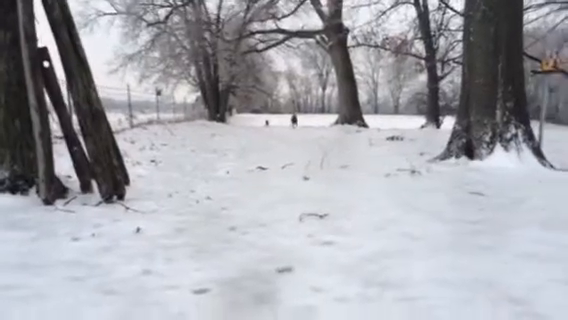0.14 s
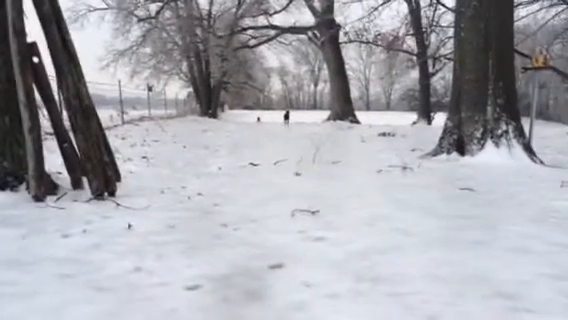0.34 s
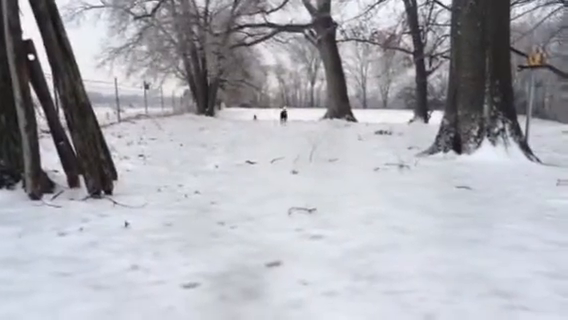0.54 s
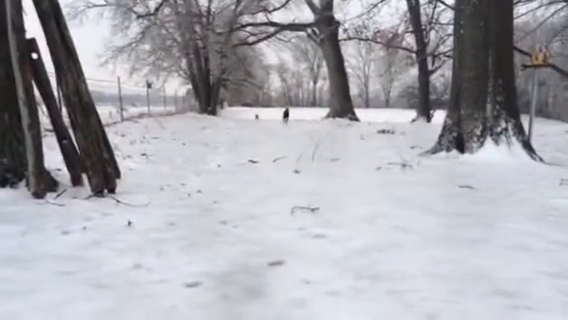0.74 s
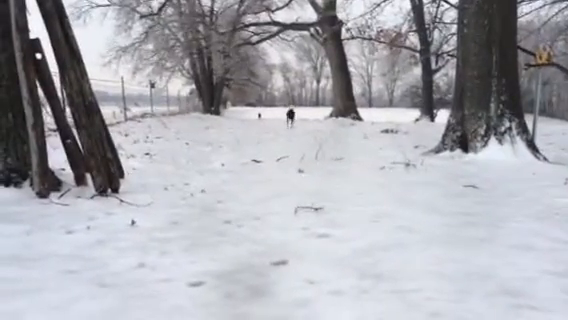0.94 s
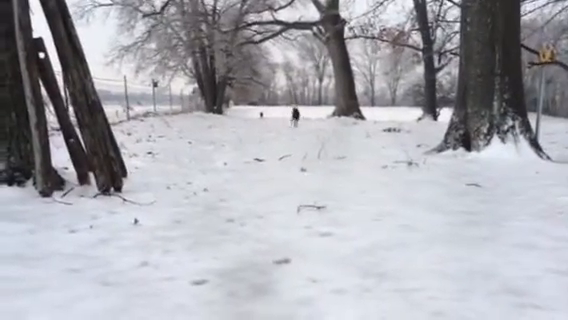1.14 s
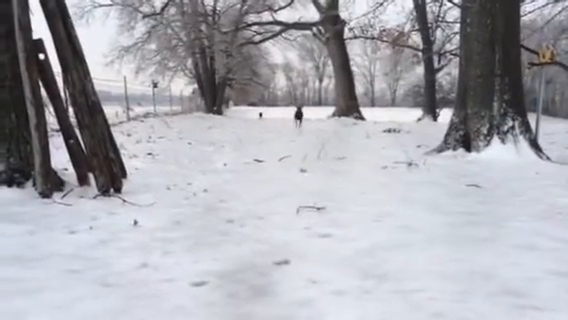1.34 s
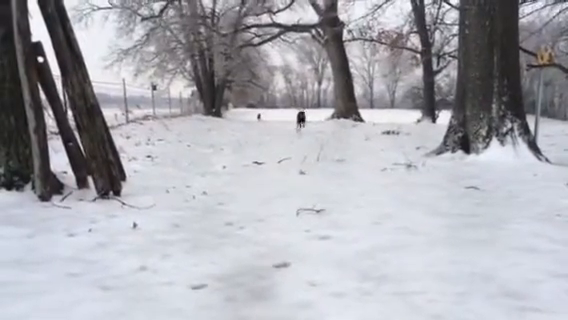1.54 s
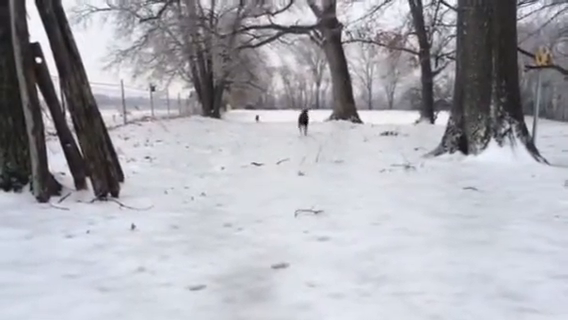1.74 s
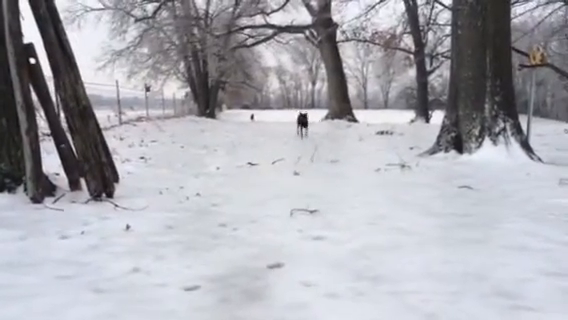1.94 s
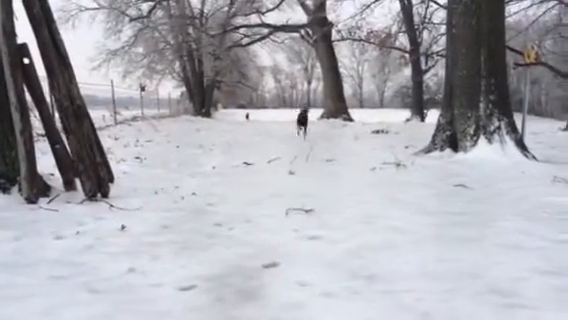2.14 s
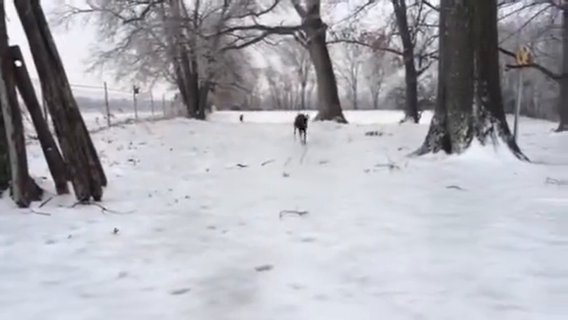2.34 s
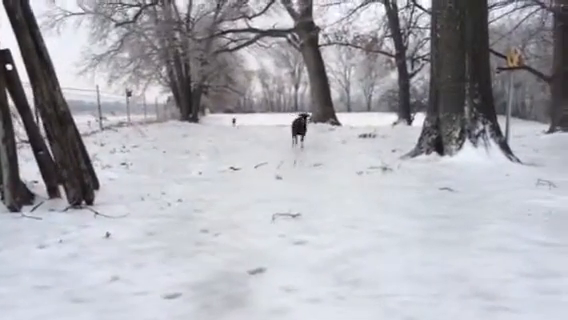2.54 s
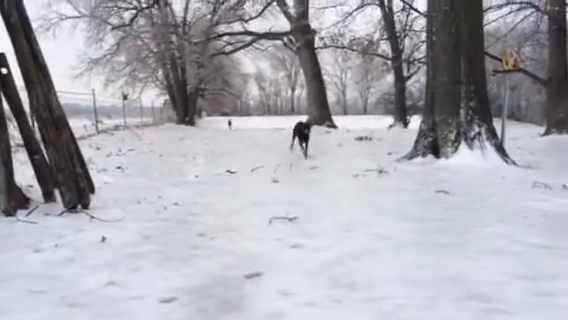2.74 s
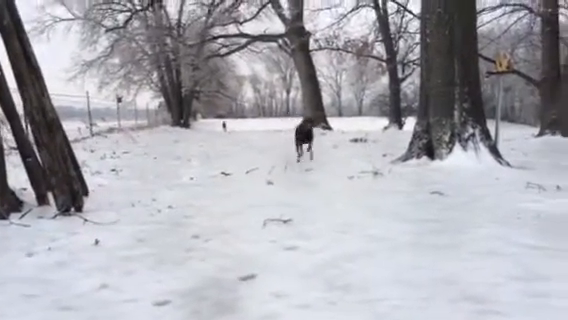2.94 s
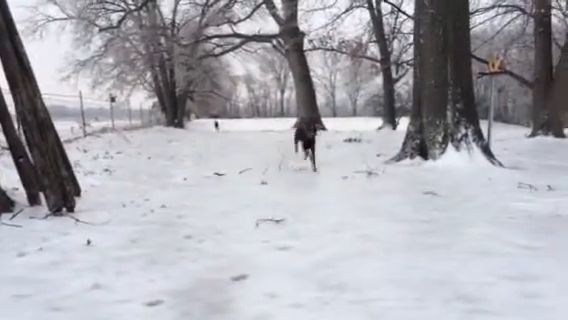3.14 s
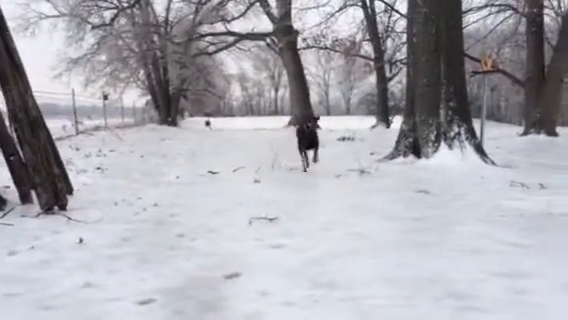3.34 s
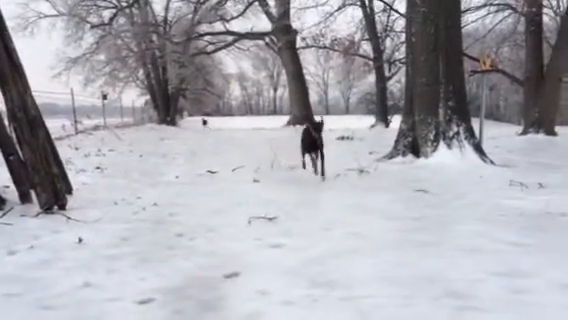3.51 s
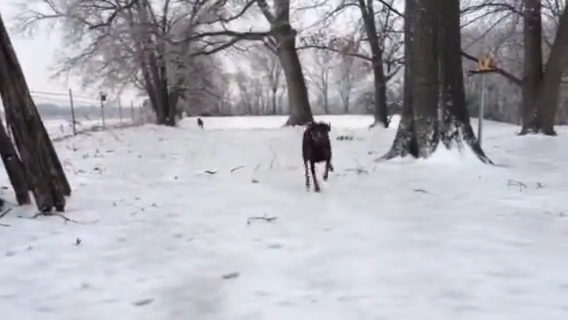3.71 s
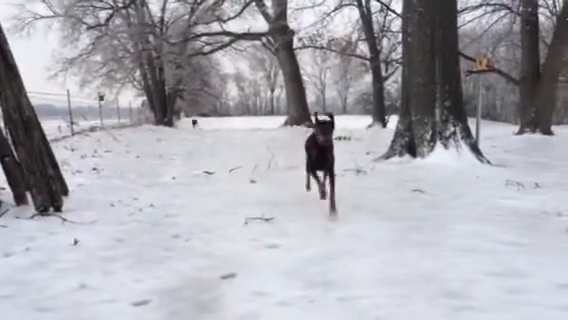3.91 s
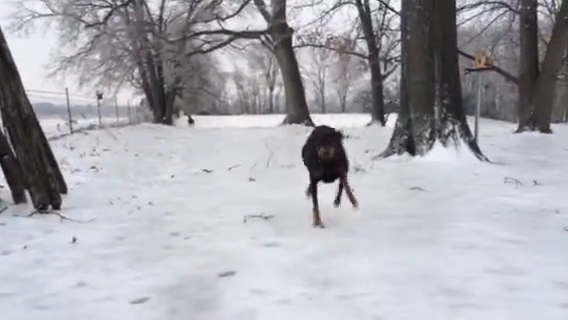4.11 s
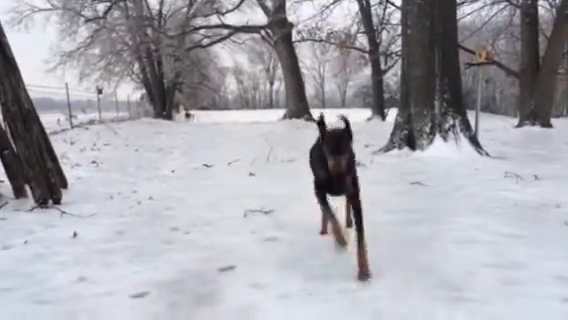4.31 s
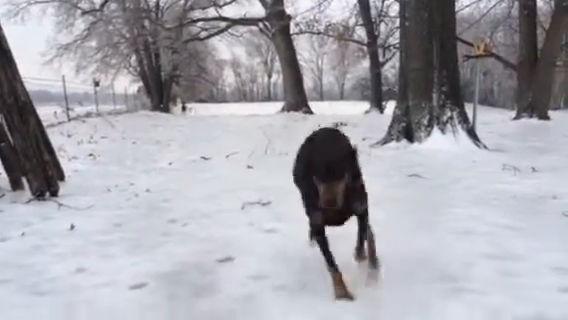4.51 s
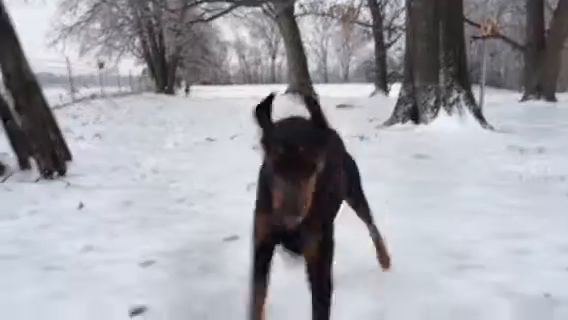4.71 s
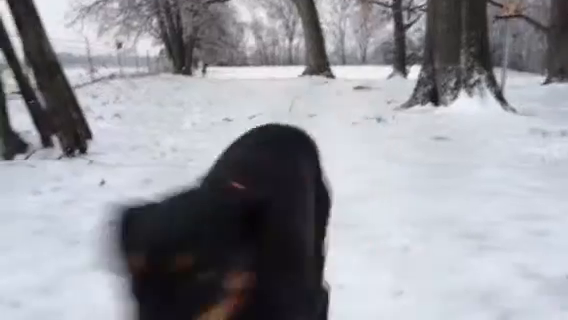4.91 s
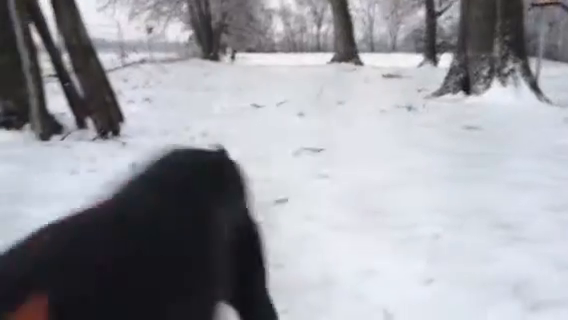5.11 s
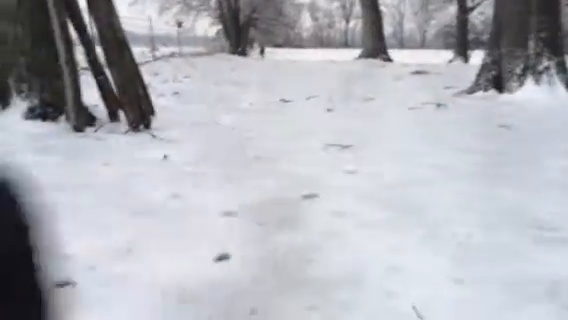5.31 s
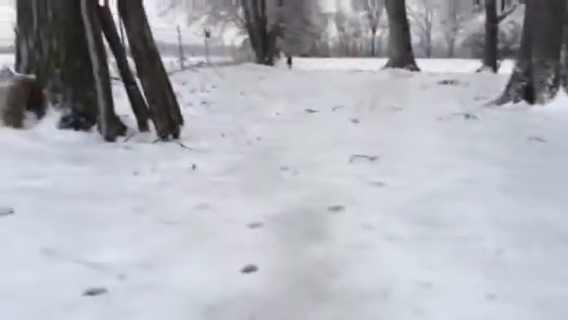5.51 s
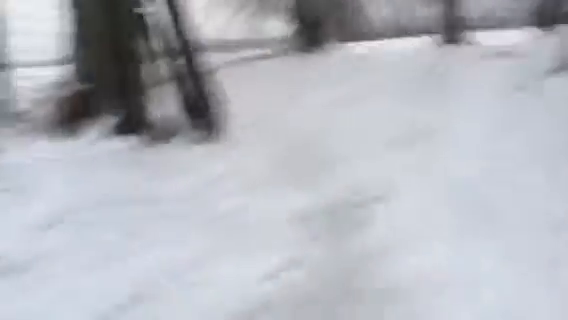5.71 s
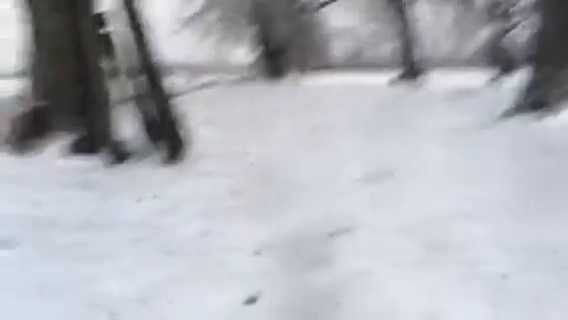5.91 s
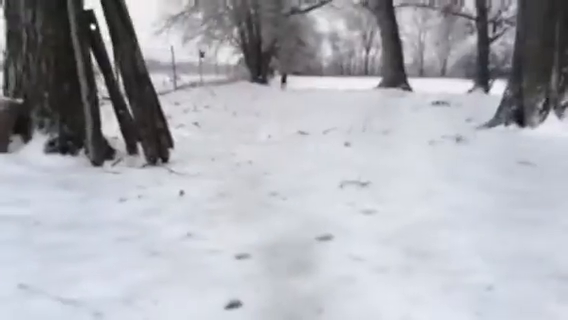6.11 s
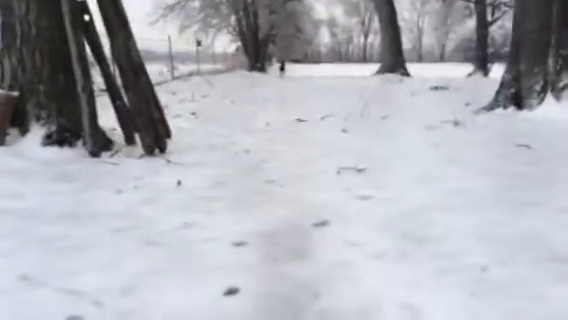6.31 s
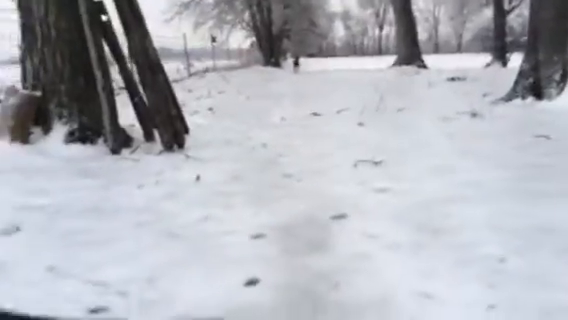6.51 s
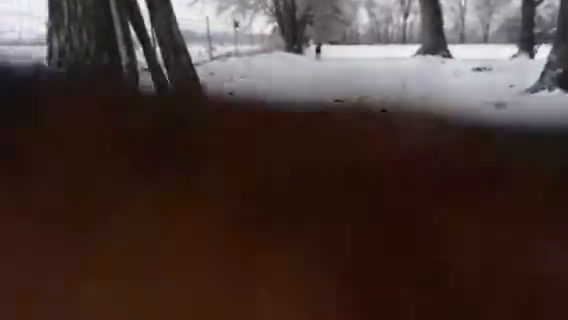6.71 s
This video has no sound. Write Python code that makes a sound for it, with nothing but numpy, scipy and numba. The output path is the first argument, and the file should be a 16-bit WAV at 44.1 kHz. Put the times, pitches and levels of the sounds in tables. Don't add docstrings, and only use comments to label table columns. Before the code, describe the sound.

In a quiet snowy wood, a dog gallops towards a low handheld phone. Faint, rapid paired crunches grow steadily louder, with icy snaps and hollow thuds. It brakes very close in a dense clatter of cracking crust and rattling clods, shuffles around, then huffs softly as the last splinters tick. Light wind buffets the microphone.

```python
import sys
import numpy as np
from scipy import signal
from scipy.fft import rfft, irfft
from scipy.io import wavfile
from scipy.ndimage import uniform_filter1d
from numba import njit

SR = 44100
rng = np.random.default_rng(int(sys.argv[2]) if len(sys.argv) > 2 else 0)


def transcribe(u):
    v = np.clip(np.atleast_2d(u).T, -1, 1)
    q = np.round(v * 32767).astype(np.int16)
    wavfile.write(sys.argv[1], SR, q)


def attenuation_scalar(level_db):
    decades = np.asarray(level_db, float) / 20
    return 10 ** decades


N = 297918
SLOWS_S = 4.9

# (frequency [Hz], density [dB per Hz])
FINE = [(880, -34), (1500, -6.5), (2590, -13.5), (3150, -11.5), (4160, -7), (6240, 1.5), (7100, 1),
        (9190, -4.5), (14600, -7.5), (15500, -20), (16000, -26)]
# (frequency [Hz], density [dB per Hz])
FINE_BESIDE = [(900, -67), (1500, -19), (4000, 3), (8000, 5.5), (14600, 3.5), (16000, 1)]
# (frequency [Hz], density [dB per Hz])
COARSE = [(150, -9), (250, -11), (315, -6.5), (655, -14), (779, -13), (4000, -17.5), (5200, -50),
          (8800, -120)]
# (full load [s], crunch [dB], thud share [dB], unloading [ms])
LEAD = [(.0619, -47.5, -19, 20), (0.239, -48, -11, 24), (0.427, -52, -8, 13), (0.5978, -52.5, -1, 26),
        (0.7874, -52, -13, 9.8), (0.9787, -49, -2.5, 21), (1.1744, -46.5, -8, 10), (1.331, -44.5, 0.5, 19),
        (1.528, -45, -2.5, 7.7), (1.717, -41, -2, 17), (1.911, -44, -3, 20), (2.0912, -45.5, 3, 19),
        (2.2962, -40, -7.5, 6.4), (2.4838, -42, -5, 25), (2.6893, -38, -25, 3.4), (2.875, -35, -13, 13),
        (3.084, -41.5, -7, 9.5), (3.29, -34, -6.5, 8.8), (3.498, -38, -24, 16.6), (3.702, -37, 0.5, 26),
        (3.899, -34, -15, 18.6)]


def noise():
    return rng.standard_normal(N)


def level(x, db=0):
    return x * attenuation_scalar(db) / np.sqrt(np.mean(x ** 2))


def curve(table):
    s, *columns = np.transpose(table)
    return [np.interp(np.arange(N) / SR, s, c) for c in columns]


def colour(x, points):
    hz, db = np.transpose(points)
    grid_hz = np.arange(2049) * SR / 4096 + 1
    log_gain = np.interp(np.log(grid_hz), np.log(hz), db) * np.log(10) / 20
    cepstrum = irfft(log_gain)
    cepstrum[1:2048] *= 2
    cepstrum[2049:] = 0
    taps = irfft(np.exp(rfft(cepstrum)))[:2048]
    return signal.fftconvolve(x, taps / np.sqrt(np.sum(taps ** 2)))[:N]


@njit
def svf(x, hz, width):
    y, b, l = np.empty(len(x)), 0., 0.
    for i in range(len(x)):
        g, k = np.tan(np.pi * hz[i] / SR), width / hz[i]
        v = (b + g * (x[i] - l)) / (1 + g * (g + k))
        b, l, y[i] = 2 * v - b, l + 2 * g * v, k * v
    return y


def steady(x, hz, width_hz):
    return svf(x, np.full(N, float(hz)), float(width_hz))


def add(out, s, piece):
    i = int(s * SR)
    out[max(i, 0):i + len(piece)] += piece[max(-i, 0):N - i]


def even(x, span_s):
    return x / np.sqrt(uniform_filter1d(x ** 2, int(span_s * SR)) + 1e-9)


def swells(s, db, rise_ms, fall_ms):
    out, t = np.zeros(N), np.arange(-SR // 8, SR // 5) / SR
    steepness = np.where(t < 0, 3.5, 1.35)
    for top_s, top_db, rise, fall in zip(s, db, np.clip(rise_ms, 1, 150), np.clip(fall_ms, 1, 150)):
        away = np.abs(t) * 1000 / np.where(t < 0, rise, fall)
        add(out, top_s + t[0], attenuation_scalar(top_db - 9 * away ** steepness))
    return out


def grit(per_s, spread_db, burst_s):
    chance, size = rng.random((2, N))
    size_db = np.minimum(-spread_db * np.log(size + 1e-9), 4 * spread_db)
    grains = (chance < per_s / SR) * attenuation_scalar(size_db)
    return level(signal.lfilter([1], [1, -np.exp(-1 / (burst_s * SR))], grains) * noise())


def shards(x, glide_s, share):
    hold = int(.003 * SR)
    hz = np.repeat(1100 * 9 ** rng.random(N // hold + 1), hold)[:N]
    ring = svf(x, uniform_filter1d(hz, int(glide_s * SR) + 1), 620.0)
    return (1 - share) * x + share * 2.14 * ring


def air():
    # (time [s], level [dB], rising [ms], fading [ms])
    puff_events = [(.03, -61, 27, 10), (.31, -45, 9.9, 18), (.364, -48, 12, 7.8), (0.614, -43, 40, 12),
                   (.69, -57, 45, 17), (1.54, -45.5, 30, 72), (2.34, -55, 15, 94), (2.943, -35, 13, 17),
                   (3.556, -39.5, 18, 19), (3.626, -35, 16, 17), (3.69, -43, 38, 52), (4.098, -52, 27, 14),
                   (4.543, -30.5, 62, 12), (4.874, -22, 15, 26), (5.237, -23.5, 38, 29),
                   (5.308, -29, 10, 48), (5.676, -25.5, 16, 13), (5.84, -46, 160, 32), (6.066, -31, 26, 31),
                   (6.17, -42, 35, 46), (6.487, -27, 7.3, 11), (6.6, -48, 20, 180)]
    # (frequency [Hz], density [dB per Hz])
    buffet = [(20, -50), (45, -3), (85, -3), (130, -5), (200, -14), (300, -45.5)]
    # (frequency [Hz], density [dB per Hz])
    wood = [(35, 5), (60, -1), (108, -27), (268, -9), (803, -10), (4030, -13), (6140, -13.5), (12000, -17),
            (14600, -28), (16000, -35)]
    puffs = swells(*np.transpose(puff_events)) + attenuation_scalar(-62.5)
    gusts = even(colour(noise(), buffet), 0.043)
    gusts = gusts - (np.arange(N) / SR > SLOWS_S) * steady(gusts, 52, 108)
    return puffs * gusts + level(colour(noise(), wood), -63.5)


def crumbs():
    # (time [s], level [dB])
    stir = [(0, -58.5), (2, -46.5), (4, -48), (4.3, -43.5), (4.46, -42), (4.65, -29.5), (5.05, -30.5),
            (5.37, -28.5), (5.41, -52), (5.5, -54), (5.57, -37), (5.86, -40), (5.92, -44), (6.04, -27),
            (6.13, -37.5), (6.46, -37.5), (6.58, -44.5), (6.76, -44)]
    gallop_end_s, rest_db_per_s = stir[2][0], 32
    turn_from_s, turn_to_s, turn_db, drag_share_db = 5.52, 5.93, 12, -7.5
    t = np.arange(N) / SR
    fine_db, = curve(stir)
    landed_s = np.array([row[0] for row in LEAD])
    since_s = t - landed_s[np.maximum(np.searchsorted(landed_s, t) - 1, 0)]
    fine_db = fine_db + (t < gallop_end_s) * (4.0 - rest_db_per_s * since_s)
    turning = np.clip(np.minimum(t - turn_from_s, turn_to_s - t) / 0.19, 0, 1)
    drag_db = fine_db + drag_share_db + turn_db * turning
    patter = colour(shards(grit(per_s=800.0, spread_db=9.0, burst_s=0.0072), 0.00024, 0.55), FINE)
    drag = colour(grit(per_s=1200.0, spread_db=10.5, burst_s=0.0051), COARSE)
    splinters = colour(shards(grit(per_s=80., spread_db=3.5, burst_s=.0005), .0002, .75), FINE_BESIDE)
    settling = (t > turn_from_s) * attenuation_scalar(-43.5 - 40 * np.abs(t - turn_to_s))
    return settling * splinters + attenuation_scalar(fine_db - 8.5) * patter + attenuation_scalar(drag_db - 9.0) * drag


def falls():
    # (full load [s], crunch [dB], thud share [dB], unloading [ms])
    trail = [(0.118, -48.5, -21, 7.5), (0.2815, -46, -8, 11), (0.4804, -47, -5, 20), (0.65, -47, 2, 14),
             (0.8564, -46.5, 4, 9.1), (1.0223, -48.5, 12, 18), (1.233, -45, -5, 23), (1.384, -44, 6.5, 21),
             (1.6003, -45.5, -2, 17), (1.767, -43.5, 1.5, 26), (1.988, -45.5, 1, 34), (2.147, -48.5, 7, 42),
             (2.373, -39, -6, 12), (2.5477, -37.5, -4, 2.6), (2.752, -44, -3, 20), (2.94, -40, -2, 30),
             (3.148, -36.5, -2.5, 15), (3.355, -34, -10.5, 15.6), (3.5728, -35, -24, 17),
             (3.748, -33.5, -21, 29), (3.972, -33, -4, 26.5)]
    # (time [s], crunch [dB], half length [ms])
    scuffs = [
        (0.768, -54, 10),
        (1.0845, -55, 20),
        (1.19, -55, 6.1),
        (1.4557, -53.5, 12),
        (1.844, -52, 7.2),
        (2.195, -45.5, 10),
        (2.585, -42.5, 16.5),
        (2.715, -42, 15),
        (3.108, -42.5, 16),
    ]
    # (full load [s], crunch [dB], coarse share [dB], thud share [dB], unloading [ms])
    stamps = [(4.088, -33, -2, 10, 38), (4.1464, -27, -5, -6.5, 18.7), (4.41, -40.5, 12, -6, 9.9),
              (4.44, -47, -8, -6, 4), (4.4778, -29, -3.5, 1.5, 18), (4.515, -32, 2.5, -2, 3.1),
              (4.5399, -31.5, -1, 7.5, 20), (4.569, -33, -9, -1, 30), (4.845, -29, -10, -14, 9.3),
              (4.8692, -22.5, -6.5, 4, 32), (4.9319, -20.5, -6, -0.5, 19), (5.025, -54.5, 2, 14.5, 1.4),
              (5.0906, -23.5, -4, -3, 21.5), (5.166, -41, 5.5, 13, 7.6), (5.2302, -21, -3, -2, 22),
              (5.312, -30.5, -1.5, 15, 17), (5.455, -38, -3, -26, 15), (5.5661, -35, 4.5, 7.5, 4.6),
              (5.9383, -30, -5, -22, 3), (5.985, -39.5, 1.5, -11, 20)]
    # (full load [s], crunch [dB], thud share [dB], loading [ms], unloading [ms])
    slides = [(4.2184, -51, 0, 9.8, 36), (4.3415, -27, 8, 17, 10.7), (4.384, -29, -4, 16.7, 18),
              (4.6205, -39.5, 5, 12, 18), (4.708, -23.5, -1, 17, 13), (4.76, -27.5, 11.5, 26.6, 9.2),
              (4.791, -30, 12, 18, 14), (4.97, -33.5, 4, 32, 50), (5.126, -36, -17, 52, 44),
              (5.196, -27.5, 8, 12.6, 5.2), (5.297, -31.5, -15, 30, 46), (5.351, -38, 13, 13, 49),
              (5.492, -42, -9, 23, 19), (5.554, -29, 9, 32.3, 4.6), (5.6017, -34, 10, 11, 44),
              (5.687, -27, 13, 9.1, 6.1), (5.722, -32, 3, 47, 26), (5.7775, -44.5, 14.5, 16, 6.6),
              (5.828, -39, -19, 24, 27), (5.861, -38, 7, 16, 17), (5.8886, -46, 1, 5.9, 7.6),
              (6.062, -32.5, 2, 16.3, 20), (6.4961, -32, 8, 7.74, 38)]
    lead_load_ms, trail_load_ms, stamp_load_ms = 5.55, 7.8, 6.14
    lead_coarse_db, trail_coarse_db, scuff_coarse_db, scuff_thud_db = -4.5, -5.5, -8.5, -6.5
    fast_coarse_db, slow_coarse_db = -7, -1.35
    rows = [(s, db, lead_coarse_db, thud, lead_load_ms, ms) for s, db, thud, ms in LEAD]
    rows += [(s, db, trail_coarse_db, thud, trail_load_ms, ms) for s, db, thud, ms in trail]
    rows += [(s, db, scuff_coarse_db, scuff_thud_db, ms, ms) for s, db, ms in scuffs]
    rows += [(s, db, coarse, thud, stamp_load_ms, ms) for s, db, coarse, thud, ms in stamps]
    rows += [(s, db, fast_coarse_db if s < SLOWS_S else slow_coarse_db, *rest) for s, db, *rest in slides]
    return np.transpose(sorted(rows))


def paws():
    s, db, coarse_db, thud_db, rise_ms, fall_ms = falls()
    t = np.arange(N) / SR
    grains = shards(even(grit(per_s=2600., spread_db=2.3, burst_s=.0006), .005), .0004, .35)
    lumps = even(grit(per_s=900., spread_db=2.5, burst_s=0.0012), .01)

    beside = np.clip((t - 4.8) / 0.05, 0, .8)
    fine = swells(s, db + 1.15, rise_ms, fall_ms) * grains
    fine = (1 - beside) * colour(fine, FINE) + beside * colour(fine, FINE_BESIDE)

    crush = swells(s, db + coarse_db - 2.5, rise_ms, fall_ms)
    coarse = colour(crush * (0.35 * grains + 1.106 * lumps), COARSE)
    coarse = coarse - np.clip(1.3 - t / 2.26, 0, 1) * steady(coarse, 290, 190)

    load = swells(s - 0.000399 * rise_ms, db + thud_db, 0.45 * rise_ms, 0.62 * fall_ms)
    hollow_hz = np.interp(t, s, 168 * 1.14 ** rng.standard_normal(len(s)).clip(-2, 2))
    hollow_hz = hollow_hz * (1 + .45 * beside)
    uneven = even(svf(noise(), hollow_hz, 180.0), 0.013)
    push = 0.099 * load * uneven + 1.374 * np.gradient(load) * SR / 1000
    thud = push
    for width_hz in (85.0, 270.0, 270.0):
        thud = svf(thud, hollow_hz, width_hz)
    return fine + coarse + attenuation_scalar(19.0) * thud


def bursts():
    # (time [s], level [dB], ring [Hz])
    far_bursts = [(.11, -56, 600), (.234, -56, 400), (.42, -52, 4900), (.47, -54, 1400), (.54, -54, 4500),
                  (.612, -47, 3200), (.644, -46, 615), (.804, -50, 9000), (.893, -47, 8000),
                  (1.017, -45.5, 570), (1.352, -57, 1400), (1.589, -48, 600), (1.706, -47, 590),
                  (1.711, -49, 2070), (1.775, -44, 3130), (2.076, -44, 4900), (2.287, -37, 7000),
                  (2.357, -42, 7000), (2.357, -45, 1290), (2.36, -42, 557), (2.428, -43, 7260),
                  (2.427, -52, 900), (2.482, -47, 600), (2.506, -47, 1900), (2.841, -45, 3100),
                  (2.866, -36, 4900), (2.867, -49, 410), (2.932, -60, 406), (3.148, -55, 1400),
                  (3.17, -64, 276), (3.284, -56, 5000), (3.351, -41, 920), (3.368, -45, 397),
                  (3.891, -39, 7040)]
    # (time [s], level [dB], ring [Hz], dying [ms])
    near_bursts = [(4.083, -26, 566, 3), (4.121, -40, 3400, 3), (4.141, -29, 3480, 5.3),
                   (4.343, -25, 277, 5.1), (4.473, -22, 6600, 5.4), (4.497, -26.5, 277, 11),
                   (4.511, -30, 10000, 3), (4.532, -27, 595, 4.2), (4.684, -35.5, 765, 11),
                   (4.738, -35, 615, 4.2), (4.757, -23, 395, 5.6), (4.786, -35, 1430, 4.4),
                   (4.859, -24.5, 310, 7.2), (4.864, -18.5, 10100, 8.4), (4.862, -29, 806, 3.5),
                   (4.87, -39, 1390, 3.4), (4.891, -33, 1600, 7), (4.934, -28.5, 1510, 16),
                   (5.024, -29, 3600, 2.6), (5.027, -35, 328, 2.9), (5.086, -40, 404, 6.6),
                   (5.162, -25, 754, 4.8), (5.182, -29.5, 555, 14), (5.228, -28, 526, 5.3),
                   (5.276, -34, 3040, 9), (5.29, -27.5, 3800, 24), (5.304, -28, 560, 8),
                   (5.335, -41, 500, 25), (5.391, -41, 2510, 4.5), (5.486, -42, 2400, 4),
                   (5.513, -33, 3500, 5.9), (5.532, -23.5, 590, 12.5), (5.547, -24, 920, 5.4),
                   (5.556, -30.5, 278, 21), (5.591, -29, 11000, 2), (5.601, -33, 910, 8.4),
                   (5.631, -44, 2390, 2.8), (5.653, -31.5, 497, 25), (5.688, -21.5, 298, 7.6),
                   (5.69, -29, 1400, 8.7), (5.741, -36, 1500, 3), (5.819, -31, 2110, 8.2),
                   (5.849, -29.5, 4900, 3.3), (5.884, -30, 2020, 2), (6.059, -31.5, 2100, 12),
                   (6.068, -34, 393, 7), (6.216, -34, 270, 8.6), (6.48, -30.5, 227, 7.5),
                   (6.491, -34.5, 2040, 6.9), (6.745, -40, 270, 8)]
    # (time [s], level [dB], ring [Hz])
    splinters = [(5.916, -32, 5600), (5.928, -34, 3500), (5.936, -24, 6500), (5.934, -20, 1840),
                 (5.9363, -20, 1660), (5.9367, -10.5, 6370), (5.9384, -19, 7000), (5.954, -26, 5600),
                 (6.111, -31, 6500), (6.137, -37, 9500), (6.235, -33, 10000), (6.239, -30, 3500),
                 (6.519, -31, 9000), (6.593, -34, 9850), (6.682, -31.5, 3120), (6.681, -42, 12000)]
    # (time [s], level [dB], ring [Hz])
    ticks = [(0.423, -44, 6500), (1.505, -50, 6500), (1.6566, -46, 6500), (1.7173, -34.5, 6400),
             (2.0588, -47, 6500), (2.1598, -44, 6460), (2.6963, -47, 6500), (2.7525, -27, 6400),
             (2.936, -29.5, 6540), (3.3725, -36, 6500), (3.5608, -43, 6500), (4.1751, -25, 6000),
             (4.744, -9.5, 7050), (4.895, -24, 8000), (4.9344, -14, 7700), (5.001, -36, 6500),
             (5.1681, -25, 10000), (5.1814, -19, 11800), (5.195, -28, 9000), (5.4523, -24, 9000),
             (5.3839, -34, 7000), (5.393, -33, 5960), (5.4648, -27, 8500), (5.4875, -31, 2200),
             (5.5269, -22, 5500), (5.5909, -26, 5500), (5.647, -32, 5500), (5.669, -24, 7000),
             (5.7316, -20.5, 4660), (5.758, -36, 2500), (6.3604, -37, 7000), (6.41, -37, 6960),
             (6.6697, -48, 8050), (5.492, -32, 3000), (4.907, -22, 12000), (5.0435, -33, 11000)]
    burst_cycles, burst_ms, splinter_ms = 1.1, 2.8, 0.76
    relative_width = 0.48
    out, t = np.zeros(N), np.arange(SR // 12) / SR
    rows = [(s, db, hz, burst_ms + 1000 * burst_cycles / hz) for s, db, hz in far_bursts] + near_bursts
    rows += [(s, db, hz, splinter_ms) for s, db, hz in splinters + ticks]
    for (s, db, hz, ms), rough in zip(rows, rng.standard_normal((len(rows), len(t)))):
        dying = np.exp(-t * 1000 / max(ms, .2))
        tune_hz = np.full(len(t), min(hz, 16000.))
        ring = svf(rough * dying, tune_hz, relative_width * hz)
        ring = svf(ring, tune_hz, 2 * relative_width * hz)
        add(out, s, attenuation_scalar(db) * ring * np.sqrt(np.sum(dying ** 2) / np.sum(ring ** 2)))
    return out


def snaps():
    # (time [s], level [dB])
    front_snaps = [(.1238, -37), (.2503, -39), (.278, -34.5), (.5951, -39), (.7944, -29), (.977, -31),
                   (1.39, -31), (1.5156, -36), (1.5986, -28.5), (1.7273, -42), (1.908, -28), (1.9644, -31),
                   (2.1446, -31), (2.2957, -25), (2.3795, -28), (2.6887, -42), (2.966, -33), (3.2875, -26),
                   (3.4969, -38), (3.5717, -25), (3.6985, -28), (3.7016, -16), (3.7476, -14.5),
                   (3.8977, -21.5), (3.9736, -18.5), (4.0161, -27),
                   (4.0861, -11.5), (4.1086, -22), (4.1446, -33), (4.1607, -13), (4.162, -17.5),
                  (4.326, -27), (4.339, -23), (4.381, -16), (4.384, -18), (4.391, -27), (4.3956, -17),
                  (4.4056, -12.5), (4.4113, -15.5), (4.421, -16.5), (4.4366, -20.5), (4.4791, -7.5),
                  (4.488, -9.5), (4.5003, -13), (4.5262, -16), (4.538, -3), (4.6183, -20), (4.74, -22),
                  (4.756, -5), (4.786, -17), (4.8678, -11)]
    # (time [s], level [dB], ring [Hz])
    slabs = [(1.1883, -40.5, 1600), (1.5832, -46, 3530), (1.8443, -39.5, 3040), (4.094, -24, 1610),
             (4.12, -24, 1520), (4.174, -26.5, 1480), (4.515, -15.5, 3320), (5.0245, -22.5, 1650),
             (5.5267, -28, 1010), (5.638, -29, 2700), (5.684, -16, 1560), (5.786, -29, 3030),
             (5.844, -25, 5000), (5.9704, -28.5, 2920), (6.4988, -22, 1940)]
    # (time [s], level [dB], ring [Hz])
    chips = [(4.8439, -17, 12600), (5.0897, -11, 10300), (5.179, -34, 12600), (5.253, -12, 11000),
             (5.373, -15.5, 9900), (5.455, -13.5, 6800), (5.5635, -13, 4670), (5.5843, -13.5, 12000),
             (5.6318, -22.5, 5200), (5.6644, -21, 6750), (5.776, -22, 5430), (5.8104, -20, 5500),
             (5.8266, -19, 6850), (5.878, -25, 5300), (5.893, -18.5, 6900), (5.939, -12, 7940),
             (5.989, -18, 8200), (6.0162, -16, 9850), (6.084, -23.5, 6350), (6.12, -30, 13500),
             (6.172, -29, 9500), (6.218, -26, 12000), (6.267, -32, 11000), (6.511, -24, 4400),
             (6.608, -33, 13800)]
    port_hz, port_scatter = 6380, 0.98
    front = front_snaps
    pitches_hz = port_hz * port_scatter ** rng.standard_normal(len(front))
    return [(s, db, hz) for (s, db), hz in zip(front, pitches_hz)] + slabs + chips


def cracks():
    tick, ring, body = np.zeros((3, N))
    t = np.arange(SR // 200) / SR
    rows = snaps()
    for (s, db, hz), rough in zip(rows, rng.standard_normal((len(rows), len(t)))):
        burst = rough * np.exp(-t / .0013)
        burst = burst / np.sqrt(np.sum(burst ** 2))
        add(tick, s, attenuation_scalar(db + 8.0) * burst)
        if s < SLOWS_S or hz < 4200:
            add(body, s, attenuation_scalar(db + 13.5) * burst)
        add(ring, s, attenuation_scalar(db + 5.0) * np.sin(2 * np.pi * hz * t) * np.exp(-t * hz / 1.38))
    ring = signal.lfilter(*signal.butter(2, 750, "highpass", fs=SR), ring)
    return colour(tick, FINE) + ring + attenuation_scalar(-17.5) * colour(body, COARSE)


def trees(dog):
    t60_s, echo_db = 0.23, -17
    t = np.arange(SR // 3) / SR
    tail = rng.standard_normal(len(t)) * attenuation_scalar(-60 * t / t60_s) * (t > .004)
    tail = level(tail) / np.sqrt(len(t))
    tail = signal.lfilter(*signal.butter(1, 13000, fs=SR), tail)
    return attenuation_scalar(echo_db) * signal.fftconvolve(dog, tail)[:N]


def huff():
    # (time [s], level [dB], mouth resonance [Hz], throat share [dB])
    breath_path = [(6.12, -32.5, 1350, 5), (6.18, -39, 1460, -20), (6.24, -36, 1340, -12),
                   (6.29, -38.5, 1310, 13), (6.33, -34, 1430, -23), (6.365, -37, 1720, 14.5),
                   (6.425, -36.5, 1750, -3), (6.47, -41.5, 1450, -15), (6.58, -43.5, 1110, -9),
                   (6.66, -48.5, 920, -2), (6.76, -44, 1000, 0)]
    db, mouth_hz, throat_db = curve(breath_path)
    breath = signal.lfilter(*signal.butter(2, 6500, fs=SR), noise())
    narrow = svf(svf(breath, mouth_hz, 250.), mouth_hz, 250.)
    whistle = swells([6.32], [.8], [70], [120]) + 0.48
    throat = 0.91 * steady(breath, 560, 840)
    throat += attenuation_scalar(throat_db - 4) * steady(breath, 550, 290)
    throat += 1.1 * steady(breath, 215, 79)
    mix = whistle * attenuation_scalar(-3.0) * even(narrow, 0.011)
    mix += level(steady(breath, 1250, 900), -4.5)
    mix += level(steady(breath, 4300, 2400), -11.0)
    mix += level(steady(breath, 11000, 8000), -14.0)
    mix += level(throat, 0.56)
    start = np.clip((np.arange(N) / SR - breath_path[0][0]) / 0.064, 0, 1)
    return start * attenuation_scalar(db) * mix


def scene():
    dog = paws() + cracks()
    loose = dog + trees(dog) + crumbs()
    far = np.clip(.45 - np.arange(N) / SR / 7.1, 0, 1)
    loose = loose - far * steady(loose, 12500, 16000)
    return (loose + huff() + air() + bursts())[None]


def top_cut(x):
    return signal.sosfilt(signal.butter(12, 16610, fs=SR, output="sos"), x)


def record(dry):
    x = signal.sosfilt(signal.butter(2, 45, "highpass", fs=SR, output="sos"), dry)
    x = .66 * np.tanh(x / .66)
    x = signal.sosfilt(signal.ellip(8, .2, 40, 15300, fs=SR, output="sos"), x)
    return top_cut(x)


dry = scene()
out = record(dry)
transcribe(out)
```